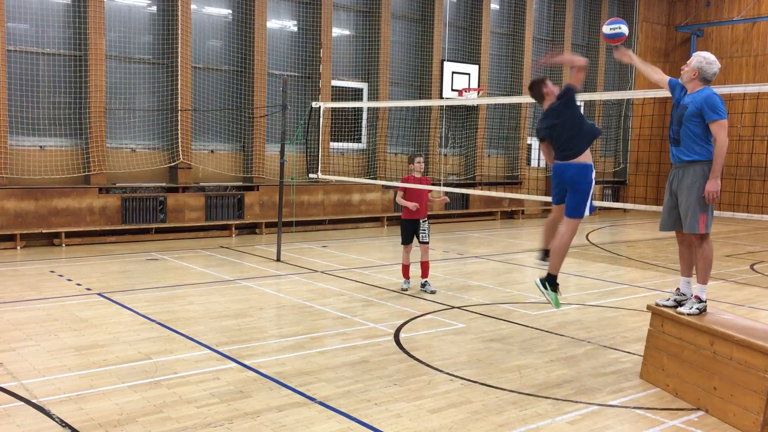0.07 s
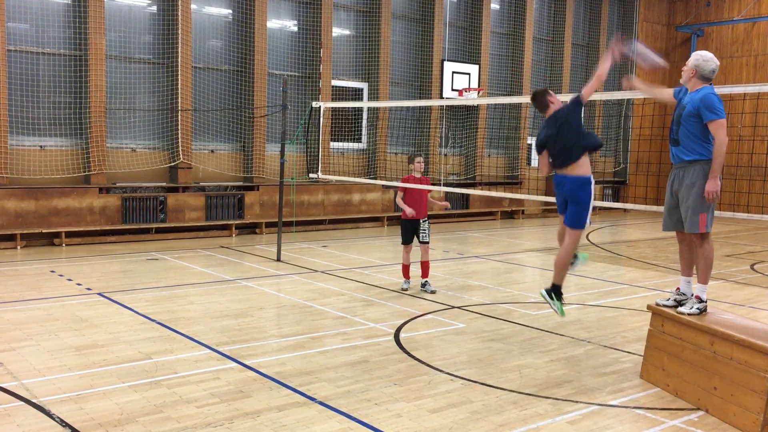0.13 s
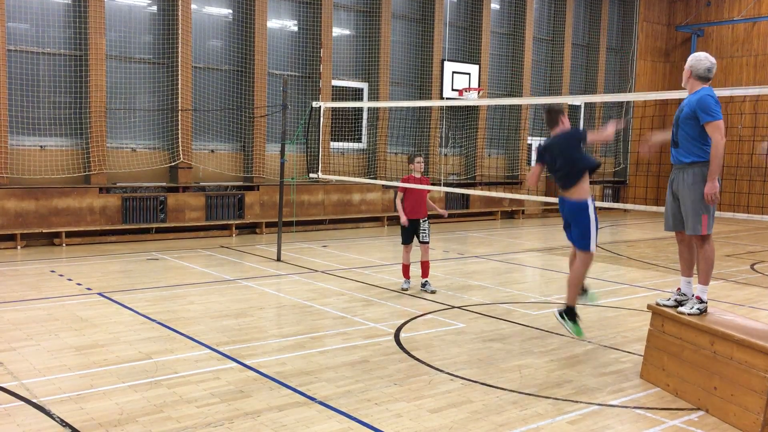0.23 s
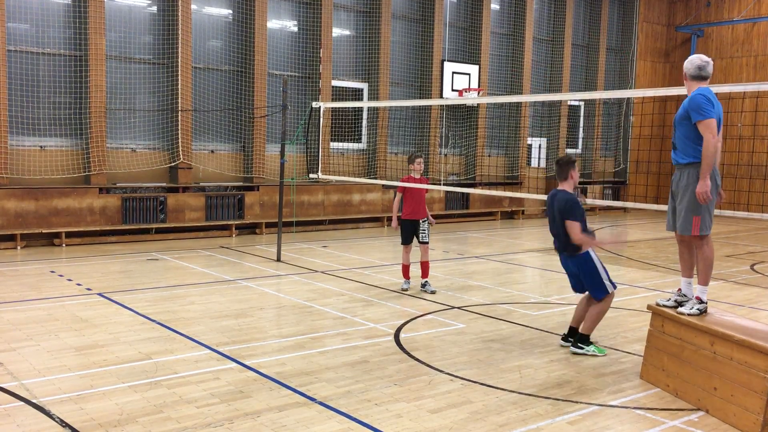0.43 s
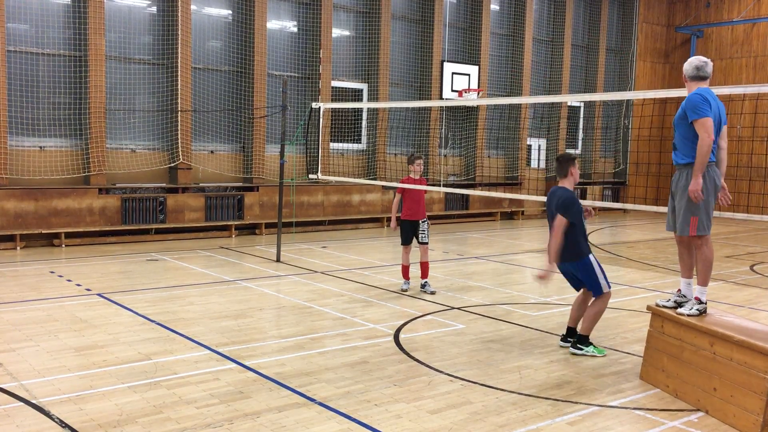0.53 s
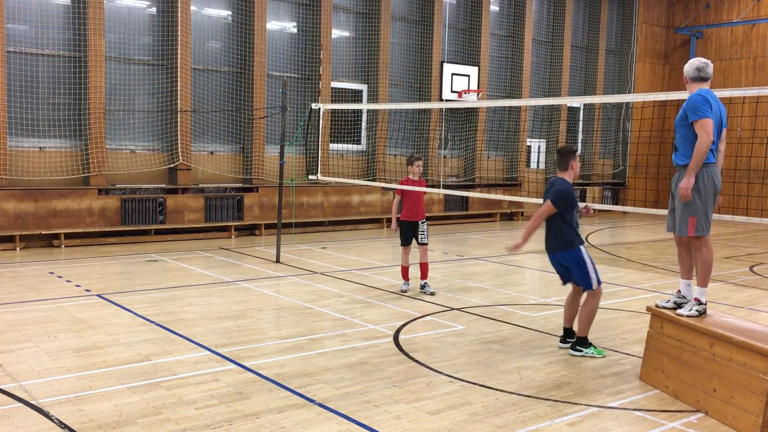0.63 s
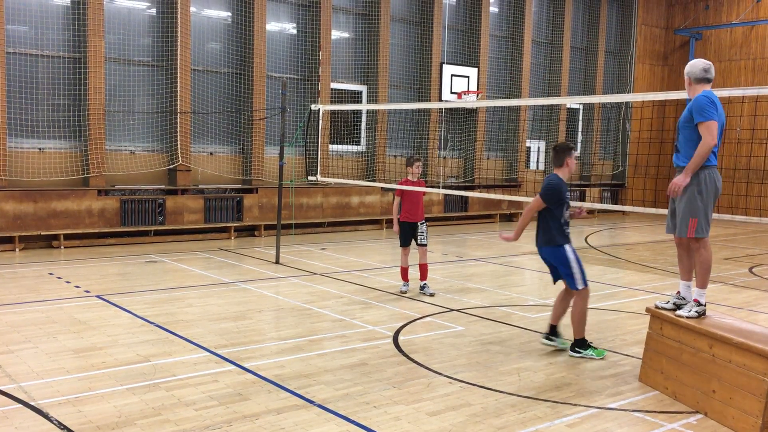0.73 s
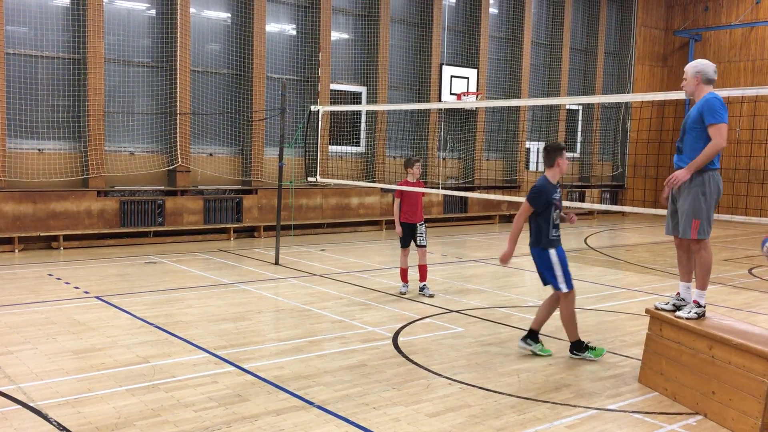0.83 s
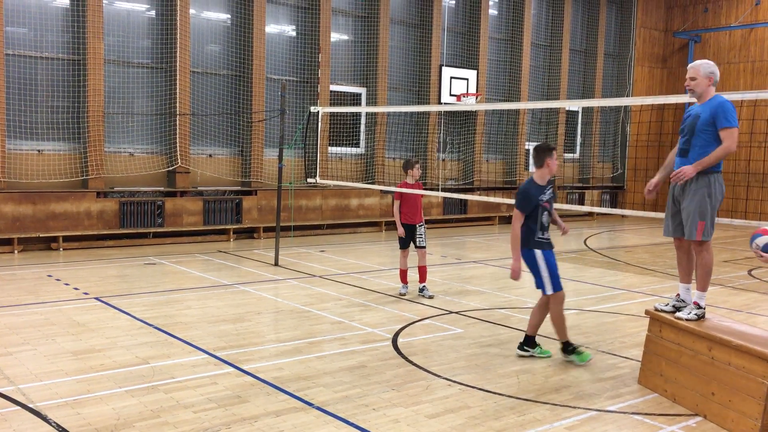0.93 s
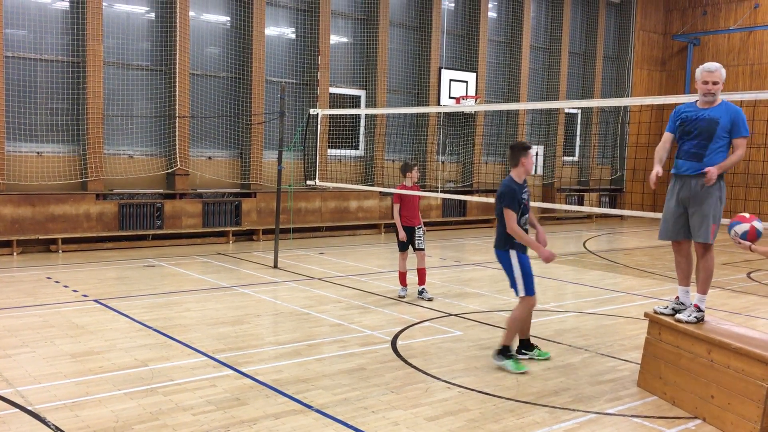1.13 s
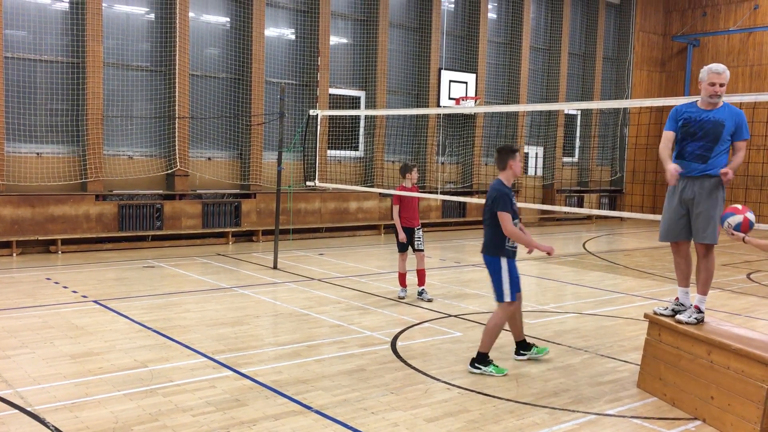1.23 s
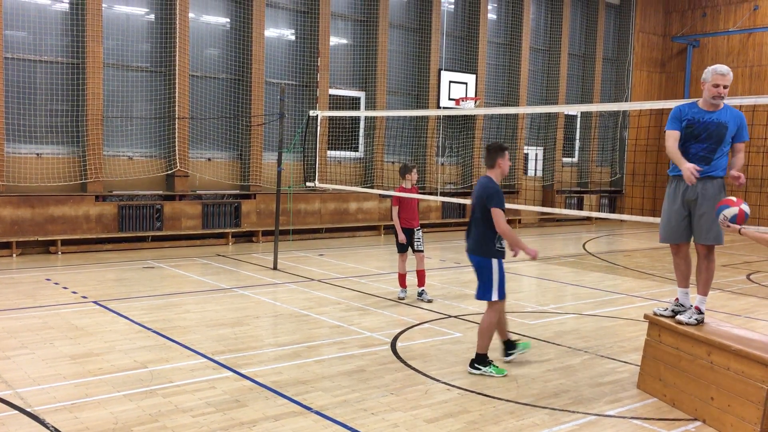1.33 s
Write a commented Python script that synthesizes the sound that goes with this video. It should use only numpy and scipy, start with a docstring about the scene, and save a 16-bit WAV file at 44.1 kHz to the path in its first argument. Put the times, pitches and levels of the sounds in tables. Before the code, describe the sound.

Heard from near the net in a big, reverberant gym, a palm cracks hard against a volleyball. Feet thud onto wooden boards and the ball hits the floor, then light shoe taps sound over a low room hum.

```python
"""A spiked volleyball sounds in a large sports hall: the palm's impact radiates a broadband crack,
and the ball's body and enclosed air vibrate in damped modes. The player's landing excites the sprung
wooden floor, and the ball slams down further off. Each impact drives a reverberant field that decays
in about two seconds at mid frequencies. Soft steps and light shoe taps follow, over the room's low hum."""
import sys
import numpy as np
from scipy import signal
from scipy.fft import rfft, irfft, next_fast_len
from scipy.io import wavfile
from scipy.ndimage import uniform_filter1d

SR = 44100
rng = np.random.default_rng(int(sys.argv[2]) if len(sys.argv) > 2 else 0)


def transcribe(u):
    """Save the signal u as a 16-bit wav file named by the first command-line argument.

    u: samples, shape (n,) or (channels, n), limited to [-1, 1]; the rate is SR.
    q: integer samples, one column per channel.
    """
    v = np.clip(np.atleast_2d(u).T, -1, 1)
    q = np.round(v * 32767).astype(np.int16)
    wavfile.write(sys.argv[1], SR, q)


N = 61739
T = np.arange(N) / SR

# Spectra of the contact noises: f/Hz, level/dB
PALM_SPECTRUM = [(400, -9.5), (1000, -13), (1900, 4.5), (3000, -13), (4300, -6), (6500, -13.5),
                 (10000, -18), (15000, -20.5)]
TICK_SPECTRUM = [(500, -16), (1300, -6), (3000, -9), (4500, -12), (8000, -26.5), (15000, -34)]
TAP_SPECTRUM = [(150, -34), (600, -38), (1500, -17), (2400, -24), (4200, -33), (7000, -42), (15000, -53)]
# Spectra with which the impacts excite the hall: f/Hz, level/dB
PALM_REVERB = [(40, -25), (90, -1), (170, 1), (330, -16.5), (600, -20.5), (850, -15.5), (1080, -9.5),
               (1400, -14.5), (2100, -19), (2900, -27.5), (5500, -28.5), (9000, -36), (15000, -41.5)]
BOUNCE_REVERB = [(40, -26.5), (80, -2.5), (170, -5), (300, -19.5), (460, -21), (620, -12.5), (760, -8.5),
                 (950, -6.5), (1200, -18), (1500, -14), (2100, -16.5), (2900, -29), (4200, -31),
                 (6000, -42.5), (10000, -41.5), (15000, -52.5)]
FOOT_REVERB = [(30, -13), (65, 2.5), (120, -13), (300, -16), (700, -31.5), (2000, -32.5), (8000, -74.5)]
TAP_REVERB = [(60, -36), (170, -21.5), (400, -36), (700, -49), (1500, -49), (4000, -52), (9000, -62.5),
              (15000, -68)]
# Modes of the ball's body and of its enclosed air: f/Hz, level/dB, T60/s
BODY_MODES = [(93.7, -11, .12), (167, -23.5, 0.53), (202.3, -2, 0.044), (277, -10.5, 0.029),
              (503, -13.5, 0.033)]
AIR_MODES = [(942, -32, 0.18), (1048, -24, 0.2), (1130, -31, 0.38), (1357, -29, 0.16), (1683, -26.5, 0.12),
             (2510, -51, .07)]
# Modes of the boards under the ball, the floor underfoot, a sole and a dull bump: f/Hz, level/dB, T60/s
BOARD_MODES = [(113, -17, 0.1), (300, -16, 0.026), (433, -15, 0.0046), (634, -1, .011), (782, -1.5, 0.014)]
FLOOR_MODES = [(63.2, -13.5, 0.28), (81, -19.5, .14), (134, -45, .08), (224, -33, .05)]
SOLE_MODES = [(1480, -22, 0.007), (901, -35, 0.0098)]
BUMP_MODES = [(130, -34, 0.035), (254, -35.5, 0.027)]
# Early reflections from walls and near surfaces: delay t/s, level/dB, low-pass cutoff f/Hz
PALM_REFLECTIONS = [(.0037, -5, 18000), (0.013, -9, 10000), (.022, -8, 10000), (0.0484, -11, 6500),
                    (.059, -10, 6500)]
BODY_REFLECTIONS = [(.05, -16, 269), (.064, -17, 220), (.12, -17, 200)]
TICK_REFLECTIONS = [(.014, -4.5, 14000), (.0225, -11, 4470), (.0412, -11, 10000), (0.057, -9.5, 10000)]
BOARD_REFLECTIONS = [(0.0132, -11, 905), (.022, -7, 1490), (.052, -15.5, 1500), (.058, -8, 1200),
                     (.092, -11, 1500)]
# Onsets of hollow knocks just after the spike, of footfalls and of shoe taps: t/s, level/dB
KNOCK_ONSETS = [(0.2568, -3.5), (.259, -18), (.2603, 2.5)]
FOOT_ONSETS = [(0.45, -3.5), (0.4639, -1), (.511, -6), (.556, -11.5), (0.586, -15), (.612, -11),
               (0.674, -16.5), (.812, -22.5), (.86, -21.5), (.955, -23.5), (1.377, -31.5)]
TAP_ONSETS = [(1.182, -11), (1.243, -11.5), (1.272, -2.5), (1.2744, -6), (1.319, -9), (1.377, -24)]
# Reverberation time of the hall: f/Hz, T60/s
REVERB_TIMES = [(60, 0.87), (170, 0.88), (400, 1.49), (850, 2.28), (2000, 2.26), (4000, 1.94),
                (6500, 1.245), (10000, 0.67), (15000, 0.49)]
# Spectra of the room's hum and of the reverberation of the player's run-up: f/Hz, level/dB
HUM_SPECTRUM = [(25, -45), (65, -22), (130, -38.5), (300, -46), (600, -54.5), (1100, -49.5), (2000, -52.5),
                (3000, -66.5), (6000, -72.5), (15000, -80.5)]
RUN_UP_SPECTRUM = [(60, -19.5), (150, -37), (500, -48.5), (1200, -45), (2200, -53.5), (4000, -67),
                   (12000, -83)]


def spike(onset_s=.2476):
    """Impulsive excitation: the palm cracks on the ball and sets its body and air modes ringing."""
    slap = contact_noise(PALM_SPECTRUM, t60=.007)
    air = ring(AIR_MODES)
    thump = ring(BODY_MODES, rise_s=.0026)
    thump = delay(thump + reflections(thump, BODY_REFLECTIONS), .001)
    early = slap + reflections(slap, PALM_REFLECTIONS) + air + thump
    slap_tail = colour(hall_response(), PALM_REVERB)
    air_tail = from_db(-38) * signal.fftconvolve(air, hall_response())[:N]
    knocks = sum(delay(ring([(1070, db, .0075)], rise_s=.00063), s) for s, db in KNOCK_ONSETS)
    return delay(early + slap_tail + air_tail, onset_s) + knocks


def bounce(onset_s=.5511):
    """Impact on a plate: the ball's skin ticks on the floor, then the boards boom in damped modes."""
    tick = contact_noise(TICK_SPECTRUM, t60=.0052)
    boom = ring(BOARD_MODES, rise_s=.00097)
    boom = delay(boom + reflections(boom, BOARD_REFLECTIONS), .00549)
    early = tick + reflections(tick, TICK_REFLECTIONS) + boom
    tail = delay(colour(hall_response(), BOUNCE_REVERB), .005)
    return delay(early + tail, onset_s)


def footfalls():
    """Free vibration: the sprung floor thuds in its low modes after the landing and each step."""
    thud = ring(FLOOR_MODES)
    return sum(from_db(db) * delay(thud + colour(hall_response(), FOOT_REVERB), s)
               for s, db in FOOT_ONSETS)


def shoe_taps():
    """Brief contact gives a wide spectrum: soles tap brightly on the boards. A dull bump follows."""
    tail = colour(hall_response(), TAP_REVERB)
    knock = ring(SOLE_MODES)
    taps = sum(from_db(db) * delay(contact_noise(TAP_SPECTRUM, t60=.006) + knock + tail, s)
               for s, db in TAP_ONSETS)
    return taps + delay(ring(BUMP_MODES), 1.378)


def ring(modes, rise_s=1e-5):
    """Modal superposition: damped sinusoids add, building up over the contact time rise_s."""
    vibration = sum(from_db(db) * decay(t60) * np.sin(2 * np.pi * hz * T) for hz, db, t60 in modes)
    return vibration * (1 - np.exp(-(T / rise_s) ** 2))


def contact_noise(spectrum, t60):
    """A short transient is broadband: a contact radiates a few milliseconds of coloured noise."""
    return colour(rng.standard_normal(N) * decay(t60), spectrum)


def decay(t60):
    """Exponential damping: the level falls 60 dB in t60 seconds."""
    return np.exp(-np.minimum(np.log(1000) * T / t60, 40))


def from_db(db):
    """Amplitude ratio of a level in decibels."""
    return 10 ** (np.asarray(db) / 20)


def at_hz(points, hz):
    """Interpolation of a table on a logarithmic frequency axis."""
    f, value = np.transpose(points)
    return np.interp(np.log(hz + 1e-9), np.log(f), value)


def delay(x, s):
    """Translation in time by s seconds."""
    return np.concatenate([np.zeros(int(max(s, 0) * SR)), x])[:N]


def colour(x, spectrum):
    """Minimum-phase filtering: folding the cepstrum gives a causal response with this spectrum."""
    size = 2 * next_fast_len(N)
    gain = from_db(at_hz(spectrum, np.fft.rfftfreq(size, 1 / SR)))
    cepstrum = irfft(np.log(gain))
    cepstrum[1:size // 2] *= 2
    cepstrum[size // 2 + 1:] = 0
    return irfft(rfft(x, size) * np.exp(rfft(cepstrum)))[:N]


def reflections(x, paths):
    """Reflection with absorption: each path returns the sound later, weaker and duller."""
    total = np.zeros(N)
    for s, db, hz in paths:
        lowpass = signal.butter(2, hz, fs=SR, output="sos")
        total += from_db(db) * delay(signal.sosfilt(lowpass, x + 1e-18), s)
    return total


def hall_response(build_s=.0034, mixing_s=.17, grain_db=2.5):
    """Diffuse reverberation: grainy reflections merge, and each band decays at its own rate."""
    grain = from_db(grain_db * np.exp(-T / mixing_s) * rng.standard_normal(N))
    local_rms = np.sqrt(uniform_filter1d(grain ** 2, size=800))
    field = rfft(rng.standard_normal(N) * grain / local_rms, 2 * next_fast_len(N))
    hz = np.linspace(1, SR / 2, len(field))
    centres = np.geomspace(40, 16000, 20)
    response = np.zeros(N)
    for centre, selector in zip(centres, np.eye(len(centres))):
        triangle = np.interp(np.log(hz), np.log(centres), selector)
        response += irfft(field * triangle)[:N] * decay(at_hz(REVERB_TIMES, centre))
    return response * (1 - np.exp(-T / build_s))


def background():
    """Stationary noise forms the room's hum; the run-up's reverberation decays into it."""
    hum = colour(rng.standard_normal(N), HUM_SPECTRUM)
    run_up = colour(rng.standard_normal(N) * decay(t60=.6), RUN_UP_SPECTRUM)
    return hum + run_up


def scene():
    """Linear superposition: the pressures of all sources add at one point beside the net."""
    return (spike() + bounce() + footfalls() + shoe_taps() + background())[None]


def record(dry):
    """Band limiting: filters remove the deepest bass and the highest treble."""
    highpass = signal.butter(4, 46, "high", fs=SR, output="sos")
    lowpass = signal.ellip(10, .1, 80, 16000, fs=SR, output="sos")
    return signal.sosfilt(lowpass, signal.sosfilt(highpass, dry))


dry = scene()
out = record(dry)
transcribe(out)
```